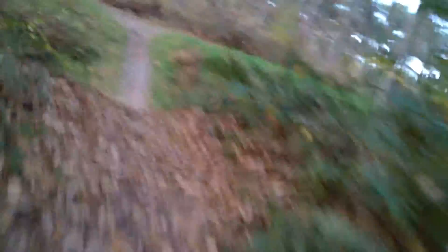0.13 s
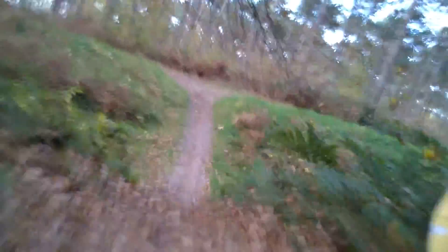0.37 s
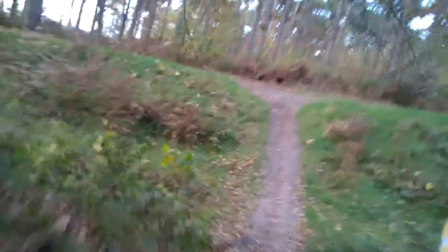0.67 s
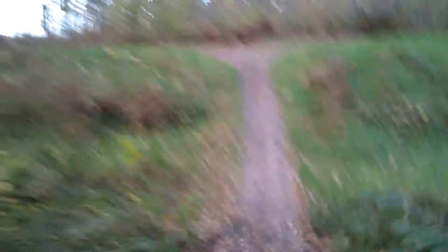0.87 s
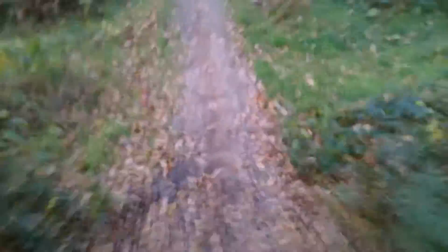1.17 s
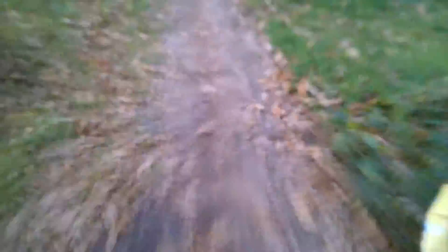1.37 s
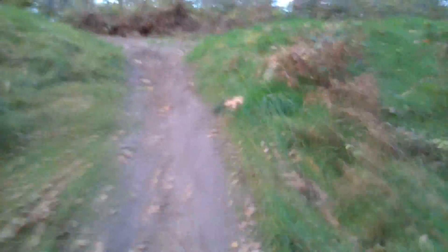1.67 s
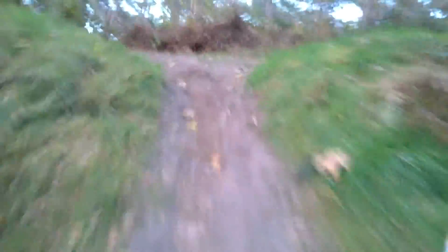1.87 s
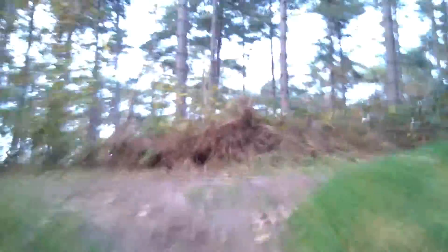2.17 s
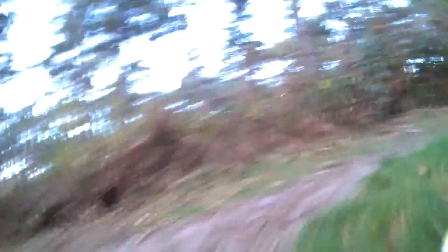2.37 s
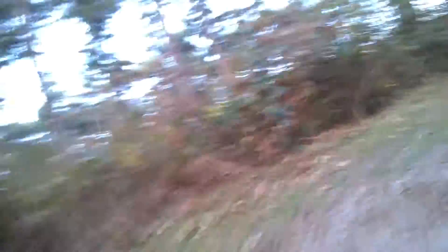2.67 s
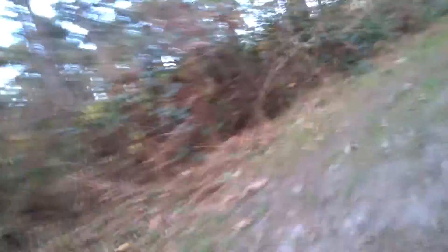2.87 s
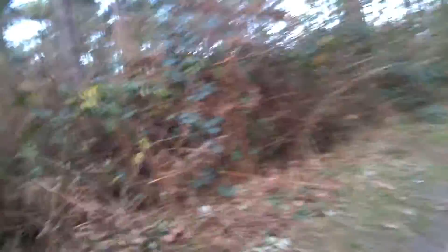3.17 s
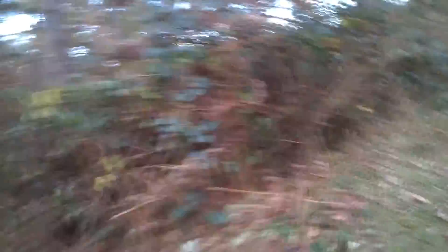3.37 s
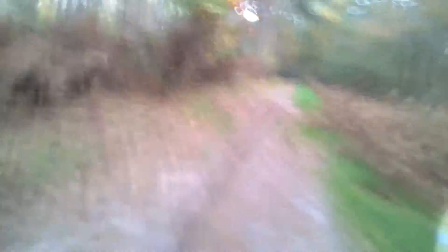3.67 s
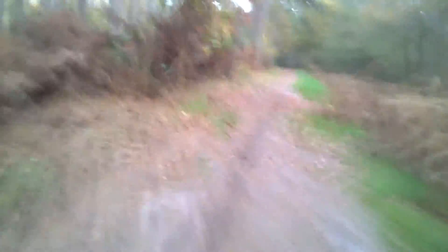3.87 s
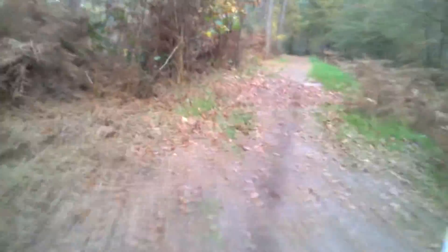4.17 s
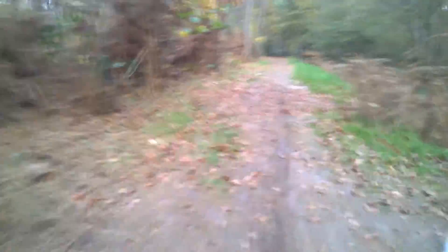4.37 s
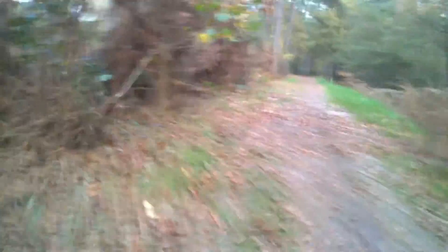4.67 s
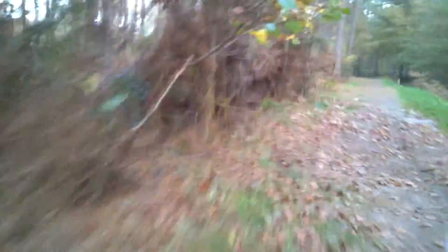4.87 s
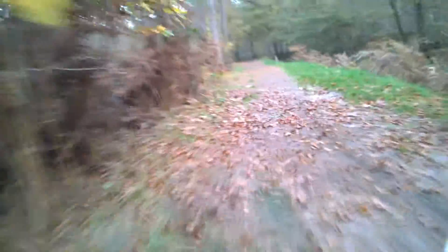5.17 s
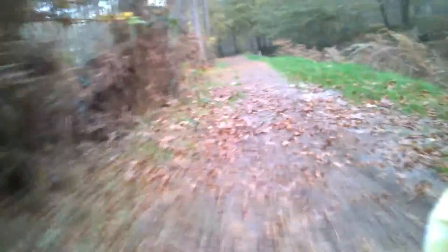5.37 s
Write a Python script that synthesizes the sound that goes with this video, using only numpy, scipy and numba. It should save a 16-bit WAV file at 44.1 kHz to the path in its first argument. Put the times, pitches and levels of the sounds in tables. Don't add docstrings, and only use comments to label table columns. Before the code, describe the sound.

Outdoors on a forest trail, heard mono and very close from a small helmet microphone on a moving mountain bike. From 0 to 1 s, abrupt low wind thumps hit at 0.2, 0.55 and 0.9 over steady buffeting, while quick metallic chain rattles and dry leaf crackle mark the bumps. Around 1.3-1.8 s it is busiest: strong gusts, hard jolts, snapping twigs, crunching leaves and a hollow frame knock. A thump follows at 2.17, then it thins, with scattered twig cracks, knocks and a flicker of freewheel ticks near 2.9. A solid knock with a faint tube ring lands at 3.13; a tiny high brake squeak passes at 3.35. More knocks come at 3.6 and 3.85, then faint, rapid, regular coasting ticks until 4.75. Massed wind thumps roar at 4.4-4.65. Leaves swell again, with bright sharp cracks at 5.2-5.35, ending in crackle at 5.5.

```python
import sys
import numpy as np
from scipy import signal
from scipy.fft import rfft, irfft
from scipy.io import wavfile
from scipy.ndimage import uniform_filter1d
from numba import njit

SR = 44100
rng = np.random.default_rng(int(sys.argv[2]) if len(sys.argv) > 2 else 0)


def transcribe(u):
    v = np.clip(np.atleast_2d(u).T, -1, 1)
    q = np.round(v * 32767).astype(np.int16)
    wavfile.write(sys.argv[1], SR, q)


def gain_from_db(level_db):
    decades = np.asarray(level_db, float) / 20
    return 10 ** decades


N = 243873
T = np.arange(N) / SR

# (time [s], level [dB])
HEAD_WIND = [(0.0, -39), (0.43, -37.5), (0.58, -44.5), (1.01, -35.5), (1.57, -27), (1.76, -29.5),
             (2.04, -32), (2.23, -38), (2.53, -41.5), (2.75, -48), (3.42, -60), (3.435, -37), (3.68, -36),
             (4.29, -40.5), (4.52, -30.5), (4.75, -43.5), (4.94, -41.5), (5.53, -51.5)]
# (fully open at [s], held [s], level [dB], eddy pitch [Hz])
GUSTS = [(0.0, 0.011, -18.5, 694), (0.207, 0.055, -14, 522), (0.55, .02, -17, 500), (0.571, .01, -14, 446),
         (0.59, 0.0072, -22.5, 380), (0.61, 0.012, -34, 300), (0.901, 0.044, -13, 640),
         (1.316, .02, -27, 830), (1.42, 0.033, -13, 540), (1.498, 0.021, -11.5, 1270),
         (1.525, 0.031, -13.5, 860), (1.69, 0.0069, -24, 493), (1.74, 0.017, -22, 496),
         (2.03, 0.02, -25, 447), (2.167, 0.031, -16, 480), (2.707, 0.014, -25, 280),
         (2.996, 0.03, -37.5, 214), (3.341, .015, -41, 375), (3.618, 0.013, -19.5, 214),
         (3.831, 0.005, -20, 394), (3.868, 0.01, -19, 300), (4.412, 0.018, -17.5, 300),
         (4.438, 0.055, -14.5, 430), (4.5, 0.084, -15.5, 363), (4.569, 0.036, -14, 388),
         (4.628, 0.022, -16, 356), (5.118, 0.053, -20, 370), (5.17, 0.027, -28.5, 310)]
# (time [s], crackle level [dB])
LITTER = [(0.0, -42), (0.28, -29.5), (0.67, -36), (1.2, -31), (1.45, -24), (1.58, -34.5), (1.74, -37),
          (1.97, -38), (2.1, -46), (2.8, -40), (3.01, -44.5), (3.42, -50), (3.44, -39.5), (3.77, -42),
          (4.63, -44.5), (4.9, -35), (5.3, -24.5), (5.53, -30.5)]
# (frequency [Hz], density [dB per Hz])
LEAF_SPECTRUM = [(500, -24), (1900, -16), (2940, -5.5), (3900, -10), (4890, -6), (6880, -5.5), (10100, 2),
                 (11700, -4), (15400, -18.5)]
# (time [s], length [s], level [dB])
LEAF_HEAPS = [
    (0.0, 0.0081, -36),
    (1.612, 0.0074, -38),
    (1.633, 0.022, -35),
    (1.714, .014, -28),
    (2.102, 0.036, -46),
    (2.831, 0.052, -39),
    (3.698, .04, -48),
    (4.569, 0.031, -34),
]
# (time [s], peak [dB], t60 [s])
JOLTS = [(0.092, -11.5, .034), (0.1785, -11.5, .036), (0.2862, -9.5, .045), (0.4187, -8, 0.039),
         (0.4643, -14, 0.042), (0.7393, -19.5, .11), (0.889, -33, .029), (1.2176, -16, 0.048),
         (1.3578, -21, .038), (1.4062, -8, .045), (1.6082, -6, 0.055), (1.716, -5.5, .051),
         (1.7574, -23, 0.024), (1.7794, -7, 0.035), (1.843, -15.5, 0.18), (1.945, -17.5, 0.15),
         (2.593, -18.5, .029), (3.2743, -16, 0.048), (3.5633, -20.5, .094), (3.7026, -13.5, 0.03),
         (3.715, -15, 0.048), (3.8446, -14, 0.057), (3.9365, -21, 0.089), (4.121, -28, 0.041),
         (4.272, -23, 0.11), (4.3804, -15, 0.033), (4.4393, -9.5, 0.026), (4.522, -22, .038)]
# (time [s], peak [dB], t60 [s])
TWIGS = [(0.2428, -14, 0.049), (0.3226, -17, 0.056), (1.0267, -18.5, 0.087), (1.296, -14, 0.2),
         (1.476, -5.5, .063), (1.5494, -4, 0.03), (1.6495, 3, 0.013), (1.9969, -18, 0.043),
         (2.39, -20, 0.038), (2.502, -20, .03), (2.52, -25, 0.16), (5.005, -21.5, 0.068), (5.06, -19, .05),
         (5.095, -12, 0.048), (5.43, -12, 0.063), (5.455, -16, .03), (2.7486, -15, 0.046),
         (2.836, -18, 0.063), (3.127, -20.5, 0.024), (3.6066, -18, 0.08), (3.8127, -22, 0.083),
         (3.8786, -22.5, 0.086), (4.36, -21, .029), (4.482, -16.5, 0.062), (4.571, -19, 0.088),
         (5.1582, -32, .03)]
# (time [s], peak [dB], t60 [s])
LEAF_CRACKS = [(1.3284, -21, .045), (1.6367, -8, .045), (1.6595, 2, 0.028), (2.6648, -10.5, 0.052),
               (3.188, -24, 0.026), (3.5389, -16, .032), (3.5857, -6.5, 0.041), (3.6351, -15, 0.018),
               (3.9998, -10, 0.02), (4.4223, -13, 0.071), (4.701, -28, .027), (5.2145, -10, .03),
               (5.222, -16, .02), (5.231, 0, 0.014), (5.2462, -15, .02), (5.2975, -1, 0.012),
               (5.3024, -6, 0.014), (5.3227, -5, 0.028), (5.354, -3.5, 0.013)]
# (centre [Hz], width [Hz], level [dB])
CHAIN_BANDS = [(3657, 250, -2), (4650, 120, -10), (5360, 110, -2.5), (5920, 160, -2), (7770, 120, 5),
               (8410, 130, 9), (9740, 750, 15.5), (11550, 52, 2)]
# (time [s], peak [dB], pitch [Hz], bright slap [dB], t60 [s])
FRAME_KNOCKS = [(0.003, -21.5, 980, -13, 0.013), (0.195, -22, 1190, -8, 0.018),
                (0.575, -13, 690, -25, 0.012), (4.56, -18.5, 1310, -23, 0.0064),
                (0.374, -24.5, 694, 5, 0.018), (1.33, -13, 1050, 5, 0.035), (1.569, -2.5, 720, -21, 0.01),
                (1.65, -9.5, 1010, -22, 0.023), (2.719, -21, 950, -27, 0.042),
                (2.832, -19, 600, 8.5, 0.078), (2.84, -15, 1160, -27, 0.019),
                (3.129, -4.5, 1023, -8, 0.019), (3.508, -33.5, 778, 10, 0.024),
                (3.606, -6.5, 1066, 0.5, 0.021), (3.636, -14, 925, 5.5, 0.015),
                (3.834, -7.5, 743, -26, 0.02), (3.849, -15.5, 1010, -26, 0.02), (4.756, -33, 675, 5, 0.083),
                (4.798, -26.5, 585, -1, 0.028), (4.875, -21.5, 586, -17, 0.011),
                (5.215, -29, 1410, 19.5, 0.031), (5.246, -33.5, 940, 21, 0.032),
                (5.261, -29, 1360, 20, 0.023)]
# (frequency [Hz], level [dB], t60 [s])
TUBE_MODES = [(398, -24, .08), (624, -17, .16), (711, -26, .09), (797, -16, .05), (3085, -36, .12)]
# (time [s], level [dB])
STONE = (3.1295, -10)
# (from [s], to [s], rate [ticks per s], level [dB])
FAST_PAWLS = (2.852, 2.95, 140, -34)
# (from [s], to [s], rate [ticks per s], level [dB])
SLOW_PAWLS = (3.8795, 4.76, 49.85, -32)
# (frequency [Hz], level [dB])
HUB_MODES = [(8100, -8), (9400, -0.5), (10100, -2.5), (11300, -13)]
# (time [s], pitch [Hz], level [dB])
SQUEAK = [
    (3.312, 9600, -50),
    (3.32, 9620, -52),
    (3.36, 9680, -32),
    (3.37, 9600, -60),
]


def unit(x):
    return x / np.sqrt(np.mean(x ** 2))


def curve(rows, silent=None):
    s, *columns = np.transpose(rows)
    return [np.interp(T, s, c, silent, silent) for c in columns]


@njit
def svf(x, hz, damping, low):
    y, b, l = np.empty(len(x)), 0., 0.
    for i in range(len(x)):
        g = np.tan(np.pi * hz[i] / SR)
        v = (b + g * (x[i] - l)) / (1 + g * (g + damping))
        y[i] = low * (l + g * v) + (1 - low) * damping * v
        b, l = 2 * v - b, l + 2 * g * v
    return y


@njit
def grains(start, hz, t60, size):
    out = np.zeros(N)
    for k in range(len(start)):
        z, p = size[k] + 0j, np.exp((2j * np.pi * hz[k] - np.log(1000) / t60[k]) / SR)
        for i in range(start[k], min(N, start[k] + int(t60[k] * SR))):
            z *= p
            out[i] += z.imag
    return out


def butter(x, hz, kind, order=2):
    return signal.sosfilt(signal.butter(order, hz, kind, fs=SR, output="sos"), x)


def noise():
    return rng.standard_normal(N)


def walk(rate):
    k = int(SR / rate)
    steps = np.repeat(rng.standard_normal(N // k + 1), k)
    return unit(uniform_filter1d(uniform_filter1d(steps, k), k)[:N])


def colour(x, points):
    hz, db = np.transpose(points)
    f = np.fft.rfftfreq(N, 1 / SR) + 1
    return irfft(rfft(x) * gain_from_db(np.interp(np.log(f), np.log(hz), db)), N)


def split(x):
    return unit(butter(x, 2820, "high", order=3)), unit(butter(x, 3390, "low", order=3))


def burst(s, t60, rise=0.00027):
    t = np.clip(T[int(s * SR):int((s + t60) * SR)] - s, 0, None)
    return (1 - np.exp(-t / rise)) * gain_from_db(-60 * t / t60)


def puff(s, hold, db, quick=0.93):
    opening_db = quick * 1100 * np.clip(s - T, 0, .2)
    shutting_db = 1500 * np.clip(T - s - hold, 0, .2)
    return gain_from_db(db - opening_db - shutting_db)


def forest():
    return gain_from_db(-56.5) * unit(butter(noise(), [300, 3000], "band", order=1))


def ratchet():
    start, stop, rate, db = SLOW_PAWLS
    at = (np.arange(start, stop, 1 / rate) * SR).astype(np.int64)
    t60 = np.full(len(at), .012)
    force = 2.8 * rng.standard_normal(len(at))
    out = np.zeros(N)
    for hz, mode_db in HUB_MODES:
        spread = rng.standard_normal(len(at))
        out += grains(at, hz * (1 + .015 * spread), t60, gain_from_db(db + mode_db + force + 2.3 * spread))
    return out


def fast_pawls():
    start, stop, rate, db = FAST_PAWLS
    pawl = (T > start) * (T < stop) * gain_from_db(-40 * ((T - start) * rate % 1))
    tick = unit(butter(noise(), 5600, "high"))
    hub = unit(butter(noise(), [3300, 3900], "band"))
    return gain_from_db(db) * (pawl * tick + 0.43 * np.sqrt(pawl) * hub)


def brake_squeak():
    hz, db = curve(SQUEAK)[0], curve(SQUEAK, silent=-200)[1]
    return np.sqrt(2) * gain_from_db(db + 4.5 * walk(360)) * np.sin(2 * np.pi * np.cumsum(hz) / SR)


def knocks():
    stone_s, stone_db = STONE
    tube_hz, tube_db, tube_t60 = np.transpose(TUBE_MODES)
    at = np.full(len(TUBE_MODES), int(stone_s * SR))
    out = grains(at, 1. * tube_hz, 1. * tube_t60, gain_from_db(stone_db + tube_db))
    rough = noise()
    slap = unit(butter(noise(), [1700, 5200], "band"))
    for s, db, hz, slap_db, t60 in FRAME_KNOCKS:
        shape = burst(s, max(t60, .006), rise=.0004)
        part = slice(int(s * SR), int(s * SR) + len(shape))
        body = np.sin(2 * np.pi * hz * np.arange(len(shape)) / SR)
        crack = unit(butter(rough[part], [0.39 * hz, 1.35 * hz], "band"))
        out[part] += gain_from_db(db) * shape * (0.95 * body + 0.55 * crack + gain_from_db(slap_db - 12.5) * slap[part])
    return out


def snaps():
    fine, coarse = split(colour(noise() * gain_from_db(3 * walk(700)), LEAF_SPECTRUM))
    shake = noise()
    links = np.array([gain_from_db(db) * unit(butter(shake, [hz - width / 2, hz + width / 2], "band"))
                      for hz, width, db in CHAIN_BANDS])
    out = np.zeros(N)
    # (events, low crunch [dB], chain rattle [dB])
    for events, low_db, chain_db in ((JOLTS, -22, 1.4), (TWIGS, -3.5, 0.45), (LEAF_CRACKS, -14, -11.5)):
        for s, db, t60 in events:
            tail = burst(s, max(t60, .004), rise=0.003)
            part = slice(int(s * SR), int(s * SR) + len(tail))
            crack = .9 * gain_from_db(-60 * np.arange(len(tail)) / SR / .005)
            snap = (tail + crack) * (fine[part] + gain_from_db(low_db) * coarse[part])
            mix = gain_from_db(5 * rng.standard_normal(len(CHAIN_BANDS)))
            rattle = gain_from_db(chain_db + 1.5) * tail * unit(mix @ links[:, part])
            out[part] += gain_from_db(db - 12.5) * (snap + rattle)
    return out


def brittle_grains():
    when, pitch, rarity, length = rng.random((30000, 4)).T
    hz = 600 + 15400 * pitch
    size = gain_from_db(-2.2 * np.log(rarity + 1e-9))
    return unit(grains((when * N).astype(np.int64), hz, (8 + 70 * length ** 2) / hz, size))


def crushing():
    give = (rng.random(N) < 120 / SR) * gain_from_db(3.5 * noise())
    fade = np.exp(-1 / (.006 * SR))
    return .5 + unit(uniform_filter1d(signal.lfilter([1], [1, -fade], give), size=110))


def leaves():
    fine_db = curve(LITTER)[0]
    coarse_db = -58 + 1.38 * (fine_db + 40)
    tread_db = -60 + 0.55 * (curve(HEAD_WIND)[0] + 40) + 4 * walk(6.01)
    grit = unit(sum(gain_from_db(2.36 * walk(40)) * butter(noise(), [lo, lo + 1800], "band")
                    for lo in range(500, 16000, 1800)))
    crushed = unit(crushing() * (brittle_grains() + .3 * grit))
    fine, coarse = split(colour(crushed + .65 * grit, LEAF_SPECTRUM))
    tread = unit(svf(noise(), np.full(N, 1550.), .14, 0.))
    fine_gain = gain_from_db(fine_db - 1.0) + sum(puff(*heap, quick=2.2) for heap in LEAF_HEAPS)
    return fine_gain * fine + gain_from_db(coarse_db + 2.5) * coarse + gain_from_db(tread_db) * tread


def eddies(hz, wander, flutter_db, damping, suck, cut_hz):
    hz = np.clip(hz * np.exp(wander * walk(60)), 60, 4000)
    x = noise() / np.sqrt(hz) * gain_from_db(flutter_db * walk(150))
    x = unit(svf(svf(x, hz, damping, 0.), 1.28 * hz, 2.54, 0.7))
    x = svf(x - suck * x ** 2, 2.12 * hz, 1.61, 1.)
    return unit(butter(x, cut_hz, "high"))


def steady_wind(wind_db):
    hz = 300 * 2 ** ((wind_db + 38.5) / 45)
    buffet = eddies(hz, wander=.08, flutter_db=1.5, damping=6.3, suck=0.12, cut_hz=124)
    return gain_from_db(wind_db + 3.0 + 1.3 * walk(18)) * buffet


def gusts(gains):
    hz = uniform_filter1d(np.array(GUSTS)[gains.argmax(axis=0), -1], size=400)
    gust = eddies(hz, wander=0.19, flutter_db=3.0, damping=1.13, suck=.2, cut_hz=122)
    gust = gust / (uniform_filter1d(gust ** 2, size=900) + 0.026) ** 0.25
    gust = svf(gust, 4.36 * hz, 1.19, 1.)
    return uniform_filter1d(gains.max(axis=0), size=130) * gust


def sway(wind_db, gains):
    rumble = unit(butter(butter(noise(), 92, "low"), 23, "high"))
    gust_db = 20 * np.log10(np.abs(uniform_filter1d(gains.max(axis=0), size=6000)) + 1e-9)
    db = -47.5 + .6 * (wind_db + 37) + 3.1 * walk(5.07) + 0.2 * np.clip(gust_db + 45, 0, 40)
    return gain_from_db(db) * rumble


def wind():
    wind_db = curve(HEAD_WIND)[0]
    gains = np.array([puff(s, hold, db) for s, hold, db, hz in GUSTS])
    return steady_wind(wind_db) + gusts(gains) + sway(wind_db, gains)


def scene():
    bike = ratchet() + fast_pawls() + brake_squeak() + knocks()
    return (forest() + bike + snaps() + leaves() + wind())[None]


def roll_off(x):
    return signal.sosfilt(signal.butter(12, 16650, fs=SR, output="sos"), x)


def record(dry):
    rounded = np.tanh(1.1 * dry) / 1.1
    low_pass = signal.ellip(10, .3, 70, 15850, fs=SR, output="sos")
    return roll_off(signal.sosfilt(low_pass, rounded))


dry = scene()
out = record(dry)
transcribe(out)
```